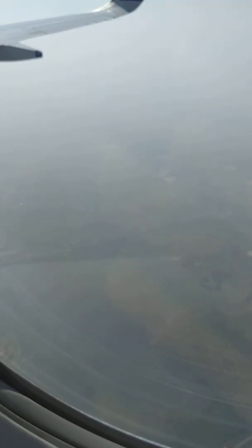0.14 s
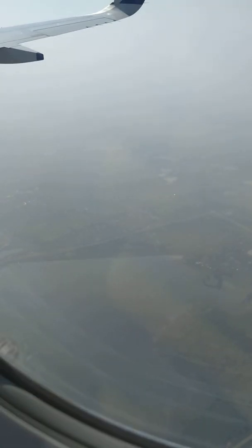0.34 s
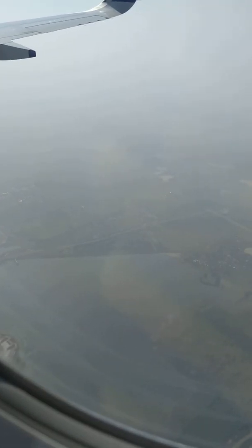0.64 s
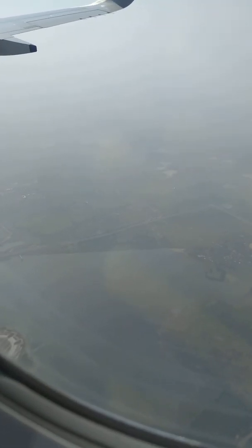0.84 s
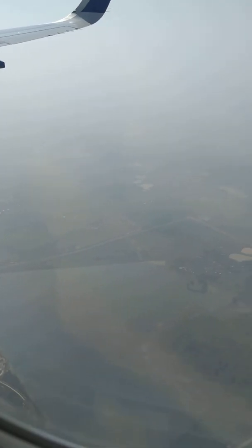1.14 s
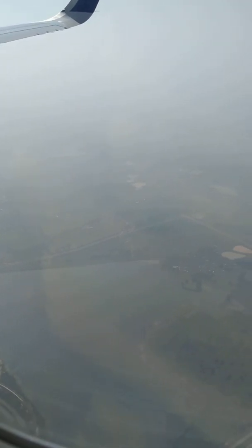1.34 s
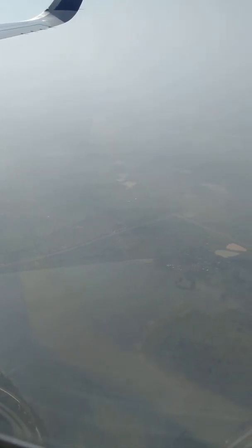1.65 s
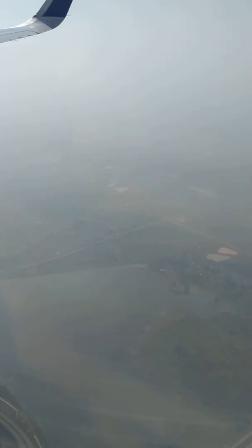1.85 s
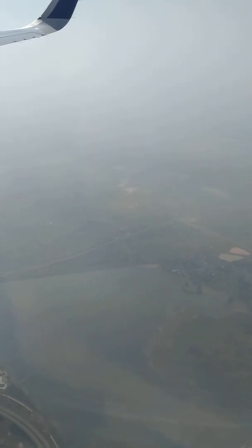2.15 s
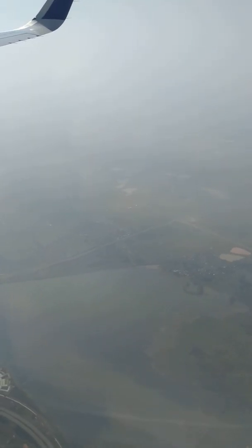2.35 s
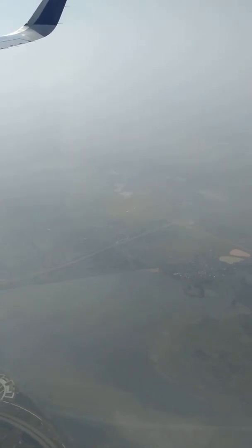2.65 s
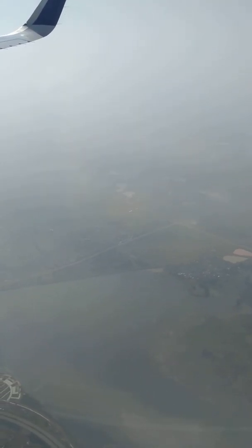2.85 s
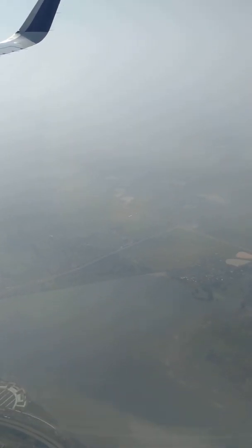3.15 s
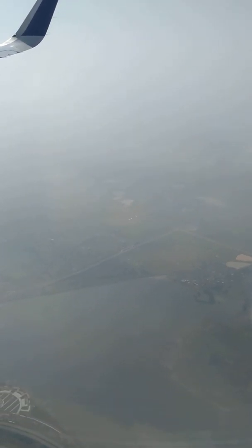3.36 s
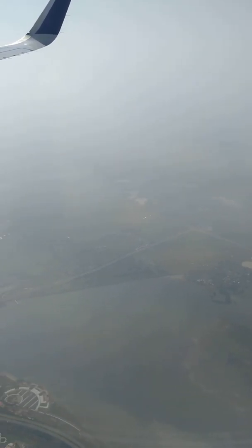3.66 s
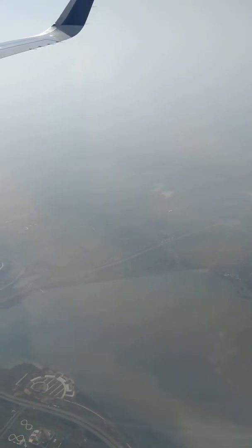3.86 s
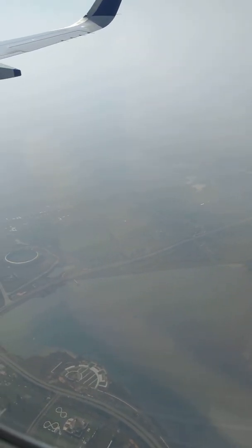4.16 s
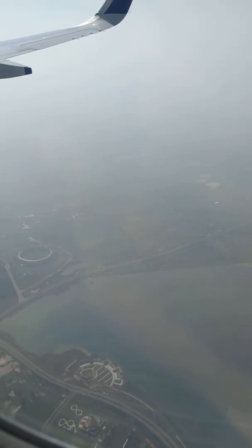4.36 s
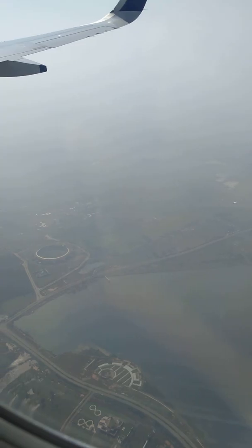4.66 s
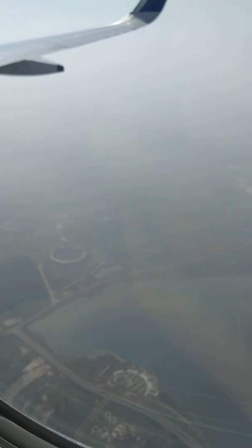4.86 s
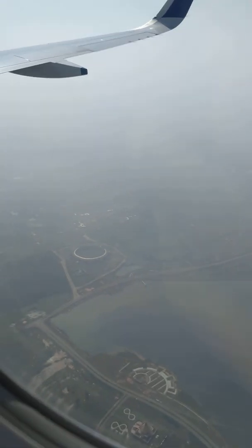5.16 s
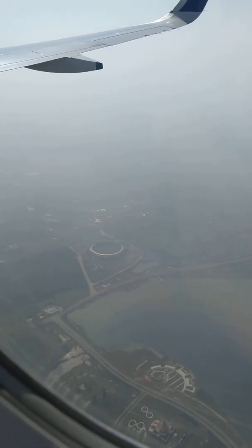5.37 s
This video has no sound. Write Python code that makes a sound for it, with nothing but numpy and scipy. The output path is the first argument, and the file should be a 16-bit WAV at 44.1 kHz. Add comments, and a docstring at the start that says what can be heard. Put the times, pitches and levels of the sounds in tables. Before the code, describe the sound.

Throughout about 5.5 seconds, a deep, dense jet roar fills an airliner cabin at a window seat, strongest in the bass, boomy and gently buffeted. Above it lies a much quieter hiss of air rushing along the fuselage, its bands fluttering irregularly. A faint steady hum, a little above 400 hertz, wavers slightly within the roar. Level rises softly from the start to about 1.5 seconds. Faint dull ticks on soft bass thumps fall near 0.8, 1.1 (a close pair), 2.1 to 2.2, 3.0, 3.3, 3.5, 3.9, 4.1 and 4.5 seconds, most with a slight sag in loudness that recovers gradually. The hiss is brighter from roughly 1.9 to 3.8 seconds; loudness eases near 4.9, and the treble grows duller toward the end. The roar never stops. Close two-microphone pickup gives a wide stereo picture with slightly hollow, combed treble.

```python
"""Jet roar fills the bass at a window seat in an airliner in flight: noise lifted by cabin booms.
Air rushes past the skin above it, a hiss whose bands flutter, and the power system hums as a wavering sine.
Now and then a faint tick, a ringing click on a bass thump, comes with a sag of the level around it.
Two close microphone ports are cross-cancelled for a wide stereo picture."""
import sys
import numpy as np
from scipy import signal
from scipy.fft import rfft, irfft
from scipy.io import wavfile
from scipy.ndimage import uniform_filter1d

SR = 44100
rng = np.random.default_rng(int(sys.argv[2]) if len(sys.argv) > 2 else 0)


def digitize_waveform(pressure):
    """Quantize a signal to 16-bit integers and store it at the path in sys.argv[1].

    Rows of a 2-D input are taken as channels; values are limited to [-1, 1].
    """
    field = np.atleast_2d(pressure).T
    bounded = np.clip(field, -1, 1)
    quanta = np.round(bounded * 32767).astype(np.int16)
    wavfile.write(sys.argv[1], SR, quanta)


N = 243873  # samples, about 5.5 s

# Jet roar through the wall: [f/Hz, left level/dB per Hz, right port louder by/dB]
ROAR_SPECTRUM = [(18, -70, 4), (28, -76, 2), (35, -76, -1), (43, -58.5, 1), (51.6, -52, 3), (77, -50, -8.5),
                 (100.6, -49, 1), (161, -46.5, -1.5), (254, -50.5, 0), (302.4, -53, -1.5), (414, -63, 4),
                 (439, -66, 4.5), (593, -72, 2), (930, -78.5, -1.5), (1054, -92, 3.5), (1390, -110, -11)]
# Cabin and panel booms that colour the roar: [f/Hz, width/Hz, left boost/dB, right boost/dB]
CABIN_BOOMS = [(56.2, 10.3, 8.5, 7), (73.9, 7.2, 7, 8), (103.9, 7.1, 2, 4.5), (134.4, 43.6, -4.5, 8),
               (139.5, 15, 3.5, 2), (178, 10.4, 0, 0), (192, 17, 1.5, 1.5), (251.5, 19.3, 0.5, 7),
               (342, 36, 0.5, 4)]
# Likeness of the roar at the two ports: [f/Hz, likeness/0 to 1, left leads by/rad]
ROAR_PORT_LIKENESS = [(30, .4, -.8), (45, 1, -0.66), (60, 0.97, 0.34), (75.5, 0.74, -1.1), (88, 0.14, -1.4),
                      (114, 0.43, 1.92), (160, 0.7, 0.23), (200, 0.56, -0.39), (313, 0.89, 1.15),
                      (382, 0.71, 0.64), (492, 0.81, 0.3), (613, 0.4, -0.47), (1000, 0.49, -0.5)]


def roar(upper_db, buffet_db):
    """Jet noise shaking the wall, coloured by cabin booms; buffeting swells its upper part."""
    left_db, right_over_left_db = over_hz(ROAR_SPECTRUM)
    alike, lead = over_hz(ROAR_PORT_LIKENESS)
    spectrum = port_noise(left_db, left_db + right_over_left_db, CABIN_BOOMS, alike, lead)
    upper_share = 1 / (1 + (330 / bins_hz()) ** 4)  # crossover at 330 Hz
    lower = irfft(spectrum * (1 - upper_share), N)
    upper = irfft(spectrum * upper_share, N)
    return lower + upper * amp(upper_db + buffet_db * drift(9.6))


# Air rushing along the skin: [f/Hz, left level/dB per Hz, right port louder by/dB, likeness/-1 to 1]
RUSH_SPECTRUM = [(600, -100, -10, 0.11), (990, -87, 0, -0.13), (1154, -79, 0.5, -0.54),
                 (1540, -80, -8.5, -0.58), (1770, -81, -6, 0.12), (2310, -82, 0.5, 0.2),
                 (2540, -82.5, -1, 0), (2580, -82.5, -1, 0.57), (2720, -83, -2, 0.25),
                 (3240, -84, -4, 0.15), (3580, -82.5, 1.5, -0.33), (4230, -88.5, -1.5, 0.095),
                 (4850, -90.5, -1.5, 0.23), (5840, -92.5, -0.5, 0.07), (7950, -97, -1.5, -0.051),
                 (9760, -101, 0, -0.025), (11550, -105, -2, -0.24), (13100, -110, 2, -0.044),
                 (14200, -119, 4, -.4)]
# Narrow peaks and dips in the rush: [f/Hz, width/Hz, left boost/dB, right boost/dB]
RUSH_PEAKS = [(1663, 99, 2.5, -11), (1990, 90, 2.5, 5), (2456, 69, -3.5, -6), (2487, 320, 4.5, 5),
              (2510, 70, 3, 3), (2586, 40, 4, 3), (4305, 50, 3.5, 2.5), (3925, 60, 3, 2), (1555, 40, 4, 1),
              (2650, 90, 0.5, -1), (1794, 35, 2.5, 2.5), (3394, 50, 2.5, 2.5), (4950, 200, 3, 1),
              (7166, 60, 3, 1), (3530, 87, -4.5, -1.5), (3920, 140, 2.5, -1), (5490, 120, 4, 2),
              (6920, 250, 1, 4.5)]


def rush(tilt_db, shared_flutter_db, own_flutter_db):
    """Boundary-layer hiss in third-octave bands; turbulence flutters them partly together, the treble tilts."""
    left_db, right_over_left_db, alike = over_hz(RUSH_SPECTRUM)
    right_db = left_db + right_over_left_db
    spectrum = port_noise(left_db, right_db, RUSH_PEAKS, alike, lead=0, ragged_db=1.3)
    together = drift(4.2)
    third = np.clip(3 * np.log2(bins_hz() / 1000), 0, 12)  # third octaves above 1 kHz
    out = 0
    for k in range(13):
        band = irfft(spectrum * np.maximum(1 - abs(third - k), 0), N)  # overlapping triangles
        octaves_above_2k = max(k / 3 - 1, 0)
        flutter = shared_flutter_db * together + own_flutter_db * drift(9.5)
        out = out + band * amp(tilt_db * octaves_above_2k + flutter)
    return out


HUM_LEFT_DB, HUM_RIGHT_DB, HUM_WAVER_DB = -44.5, -46, 1.5  # RMS level at each port, spread of its waver
HUM_START_HZ, HUM_RISE_HZ_PER_S, HUM_WAVER_HZ = 406.2, 0.7, 0.73


def hum(hz):
    """The aircraft power tone: a sine on the given pitch, wavering in pitch and level."""
    phase = 2 * np.pi * np.cumsum(hz + HUM_WAVER_HZ * drift(3.96)) / SR
    tone = np.sqrt(2) * np.sin(phase)  # RMS of 1
    return tone * amp(HUM_WAVER_DB * drift(2.6)) * amp([[HUM_LEFT_DB], [HUM_RIGHT_DB]])


TICK_HZ, TICK_WIDTH_HZ, SAG_RECOVERY_S = 750, 270, 0.42  # recovery is a time constant
THUMP_HZ, THUMP_WIDTH_HZ, THUMP_OVER_TICK_DB = 150, 160, 21.5  # level ratio ahead of the band-pass
# Ticks, each on a bass thump: [t/s, click level ahead of the band-pass/dB, sag drop/dB with sign ignored]
TICK_EVENTS = [(0.776, -38, 0.5), (1.102, -42, 2), (1.147, -37.5, 3.5), (2.107, -39, 3), (2.185, -35, -1),
               (2.968, -34, 2), (3.298, -33, 1.5), (3.503, -35, 1.5), (3.911, -33, 1), (4.108, -32.5, 1.5),
               (4.463, -32, 0)]


def ticks():
    """Clicks ring a dull tick and a bass thump; each also drops a level in dB that recovers exponentially."""
    clicks = np.full(N, 1e-18)  # tiny offset instead of pure silence
    drops = np.zeros(N)
    for s, click_db, sag_db in TICK_EVENTS:
        clicks[round(s * SR)] = -amp(click_db)
        drops[round(s * SR)] = -abs(sag_db)
    thump = amp(THUMP_OVER_TICK_DB) * ring(clicks, THUMP_HZ, THUMP_WIDTH_HZ)
    knock = ring(clicks, TICK_HZ, TICK_WIDTH_HZ) + thump
    soft = signal.sosfilt(signal.butter(2, [80, 1400], "band", fs=SR, output="sos"), knock)
    recovery = np.exp(-1 / (SAG_RECOVERY_S * SR))
    return soft, signal.lfilter([1], [1, -recovery], drops)


def ring(clicks, hz, width_hz):
    """Two-pole resonator: a unit click starts a damped sine with an envelope near 1."""
    r, w = np.exp(-np.pi * width_hz / SR), 2 * np.pi * hz / SR
    return signal.lfilter([0, np.sin(w)], [1, -2 * r * np.cos(w), r * r], clicks)


def port_noise(left_db, right_db, bumps, alike, lead, ragged_db=0):
    """Spectra of noise at two ports: the right mixes the left's noise, phase-shifted, with its own."""
    for hz, width_hz, left_bump_db, right_bump_db in bumps:
        bell = np.exp(-np.log(16) * ((bins_hz() - hz) / width_hz) ** 2)  # width at half the dB height
        left_db = left_db + left_bump_db * bell
        right_db = right_db + right_bump_db * bell
    # cabin reflections add up unevenly at each port: random dB smoothed over 30 Hz
    ragged = uniform_filter1d(rng.standard_normal((2, N // 2 + 1)), size=round(30 * N / SR))
    ragged = ragged_db * ragged / ragged.std()
    left_db, right_db = left_db + ragged[0], right_db + ragged[1]
    shared, own = rfft(rng.standard_normal((2, N))) * np.sqrt(SR / 2)  # unit power per Hz
    alike = np.clip(alike, -.99, .99)
    right = alike * np.exp(-1j * lead) * shared + np.sqrt(1 - alike ** 2) * own
    return np.array([amp(left_db) * shared, amp(right_db) * right])


def drift(rate_hz):
    """Slow random wander around zero with spread 1: noise through two equal low-pass poles."""
    step = 40  # samples between drawn points
    r = np.exp(-2 * np.pi * rate_hz * step / SR)
    noise = rng.standard_normal(N // step + 2002)
    slow = signal.lfilter([1], [1, -2 * r, r * r], noise)[2000:]  # drop the run-in
    return np.interp(np.arange(N) / step, np.arange(len(slow)), slow / slow.std())


def amp(db):
    """Decibels to gain."""
    return 10 ** (np.asarray(db) / 20)


def bins_hz(size=N):
    """Frequencies of the spectrum bins, at least 1 Hz."""
    return np.maximum(np.arange(size // 2 + 1) * SR / size, 1)


def over(axis, rows):
    """Columns of a table, joined by straight lines along its first column."""
    first, *columns = np.transpose(rows)
    return [np.interp(axis, first, c) for c in columns]


def over_hz(rows, size=N):
    """Columns of a table on a log-frequency axis."""
    log_rows = [(np.log(hz), *rest) for hz, *rest in rows]
    return over(np.log(bins_hz(size)), log_rows)


# Slow changes in flight: [t/s, overall level/dB, treble tilt/dB per octave, upper roar level/dB]
CRUISE_CHANGES = [(0, -1, 0, 4), (0.3, -0.5, 0.3, 0), (0.6, 0, -0.3, -0.5), (1.0, 1.5, 0, 0.5),
                  (1.5, 2.5, -0.1, -0.5), (1.9, 2, 0.95, 1), (2.5, 0.5, 0.5, 0), (2.9, 1, 0.8, 2),
                  (3.4, 2, 0.8, 0.5), (3.8, 1.5, 0.6, 0.5), (4.4, 2, 0, -0.5), (4.85, -0.5, -0.5, -1),
                  (5.2, 0.1, -0.9, -0.5), (5.53, 0.5, -1.4, -2.5)]


def scene():
    """Roar, rush and hum share the slow level changes and sags; the ticks are added at their own level."""
    s = np.arange(N) / SR
    level_db, tilt_db, upper_db = over(s, CRUISE_CHANGES)
    tick, sag_db = ticks()
    # the sag sets in over 91 ms, from 11 ms ahead of the tick
    sag_db = uniform_filter1d(sag_db, size=4000, origin=1500)
    tone = hum(HUM_START_HZ + HUM_RISE_HZ_PER_S * s)
    air = rush(tilt_db, shared_flutter_db=0.357, own_flutter_db=1.26)
    bed = roar(upper_db, buffet_db=0.97) + air + tone
    return amp(level_db + sag_db) * bed + tick


PORT_COMB_HZ = 2121  # one over the travel time between the ports
OVERLOAD_TOP, CUTOFF_HZ = 0.7, 14200  # ceiling of the rounding in full scale, low-pass corner
# Share of each port taken off the other channel: [f/Hz, share/0 to 1]
CANCEL_SHARE = [(300, 0.02), (600, 0.43), (1000, 0.72), (1500, 0.63), (2100, 0.79), (3200, 0.51),
                (4250, 0.57), (5200, 0.5), (6300, 0.39), (7300, 0.34), (9500, 0.08), (14000, 0)]


def record(dry):
    """Peaks are rounded; each channel loses a delayed share of the other port, combing it; the top is cut."""
    run_in = 2048  # mirrored samples at both ends
    rounded = OVERLOAD_TOP * np.tanh(dry / OVERLOAD_TOP)
    long = np.pad(rounded, ((0, 0), (run_in, run_in)), "reflect", reflect_type="odd")
    size = long.shape[1]
    share, = over_hz(CANCEL_SHARE, size)
    delay = np.exp(-2j * np.pi * bins_hz(size) / PORT_COMB_HZ)
    late = np.clip(share, 0, .95) * delay
    ports = rfft(long)
    wide = irfft(ports - late * ports[::-1], size)
    cut = signal.sosfilt(signal.ellip(12, .5, 70, CUTOFF_HZ, fs=SR, output="sos"), wide)
    return cut[:, run_in:-run_in]


dry = scene()
out = record(dry)
digitize_waveform(out)
```